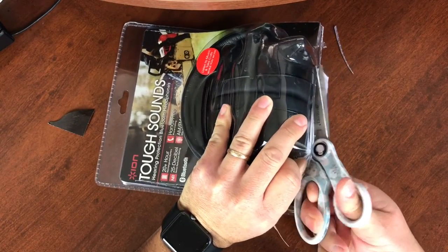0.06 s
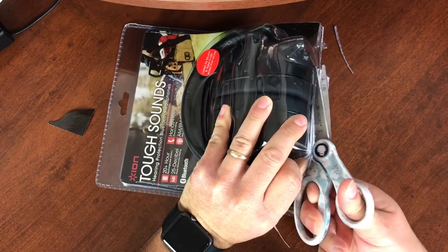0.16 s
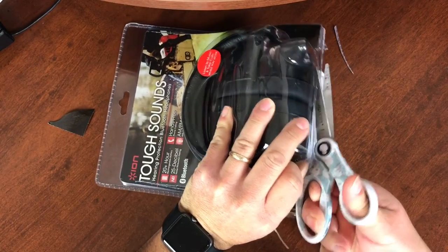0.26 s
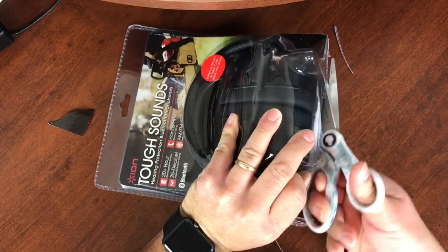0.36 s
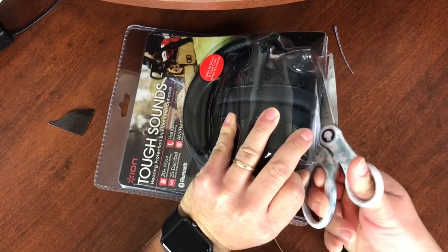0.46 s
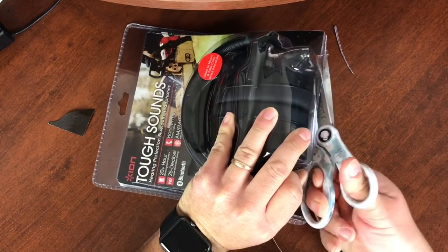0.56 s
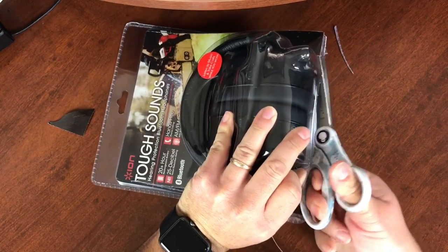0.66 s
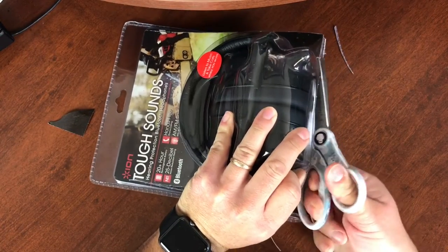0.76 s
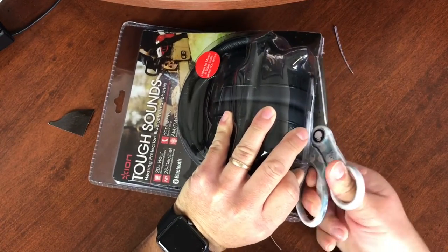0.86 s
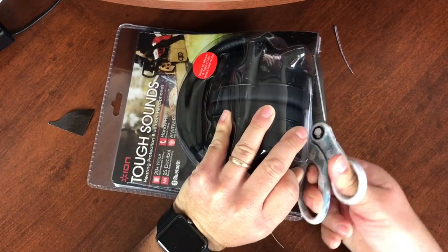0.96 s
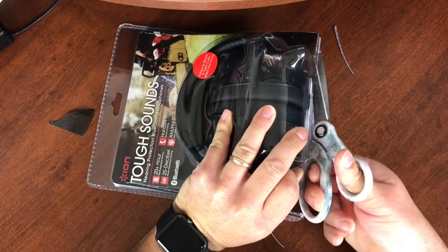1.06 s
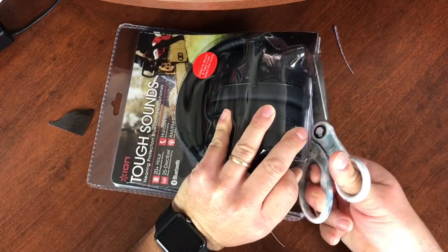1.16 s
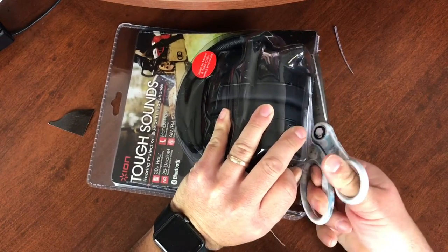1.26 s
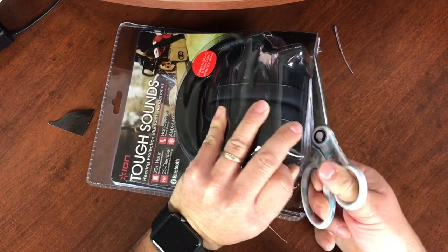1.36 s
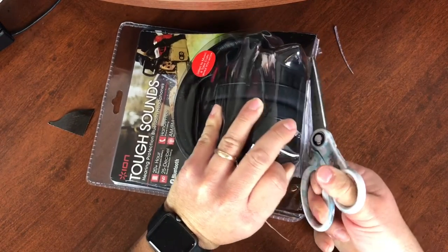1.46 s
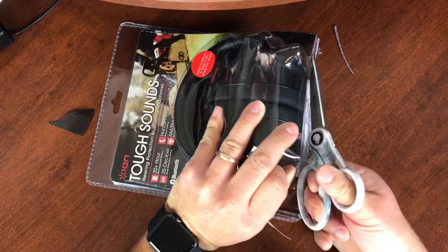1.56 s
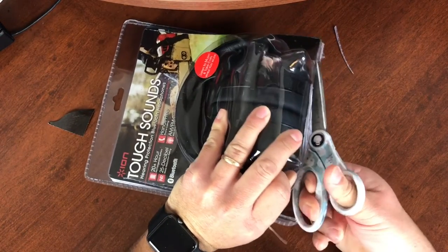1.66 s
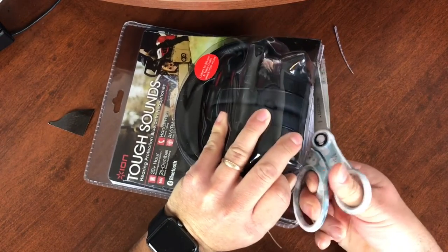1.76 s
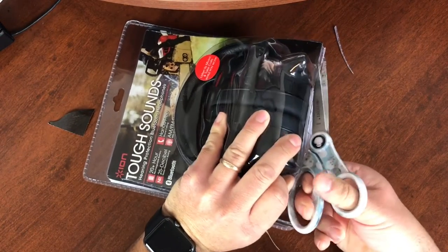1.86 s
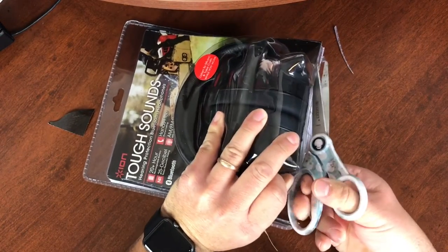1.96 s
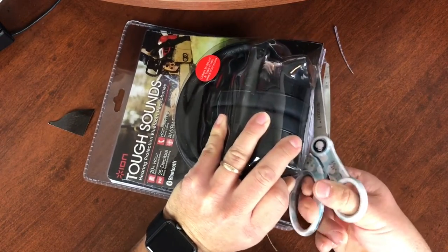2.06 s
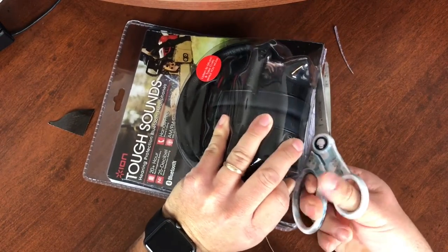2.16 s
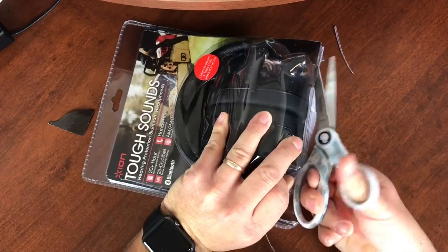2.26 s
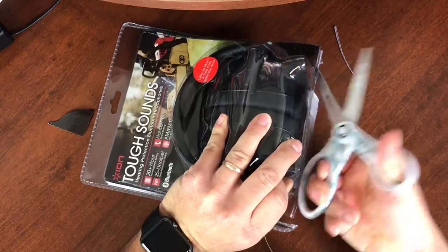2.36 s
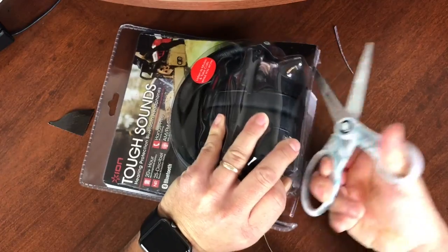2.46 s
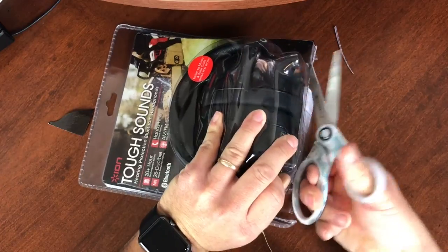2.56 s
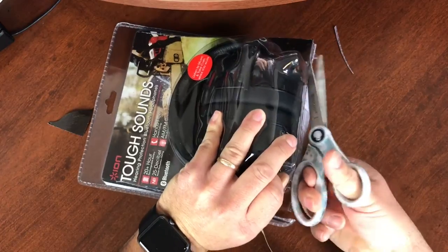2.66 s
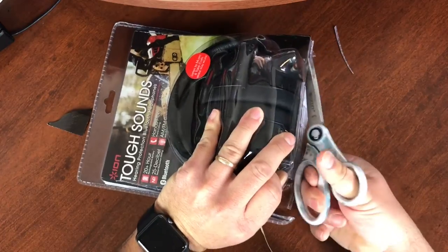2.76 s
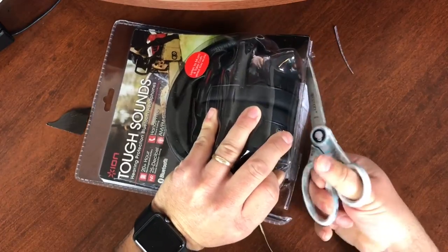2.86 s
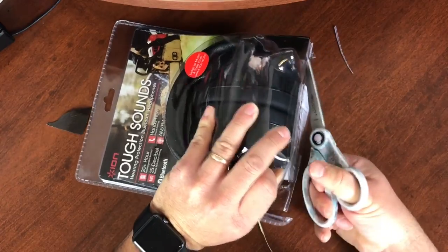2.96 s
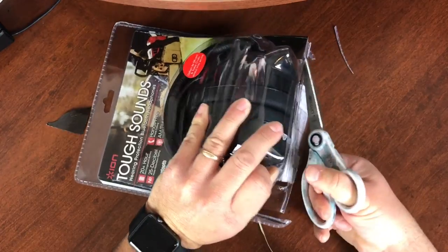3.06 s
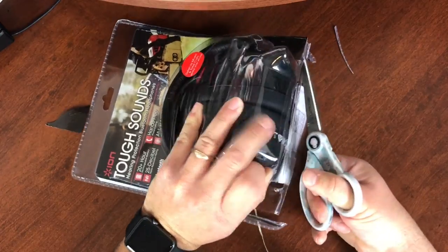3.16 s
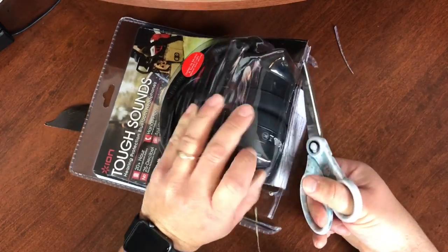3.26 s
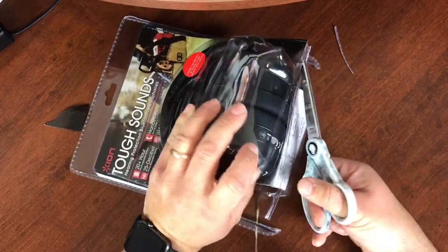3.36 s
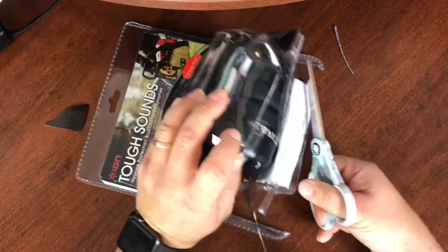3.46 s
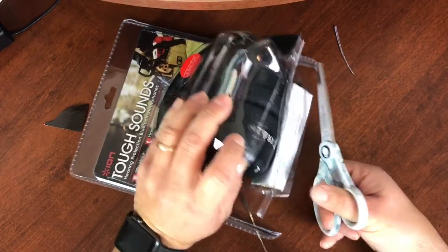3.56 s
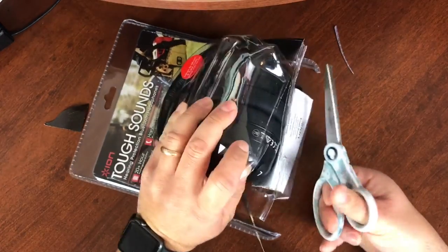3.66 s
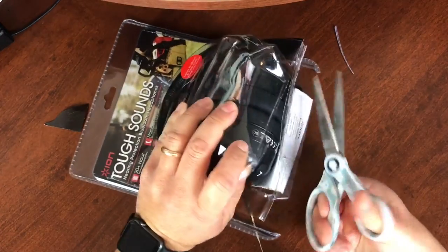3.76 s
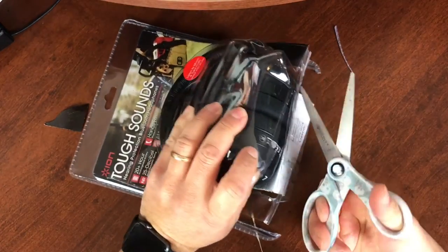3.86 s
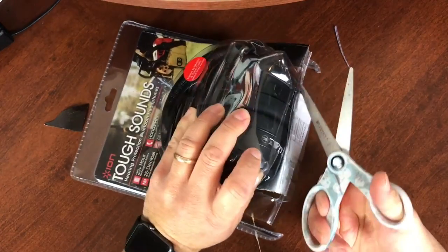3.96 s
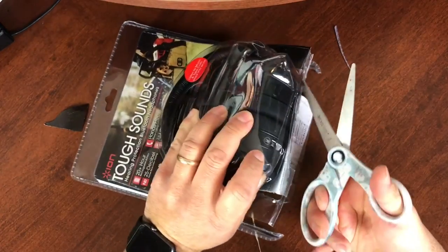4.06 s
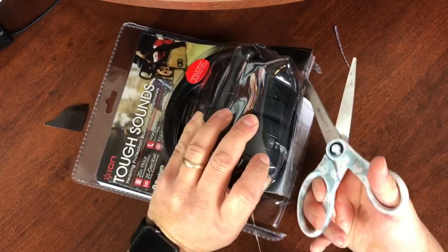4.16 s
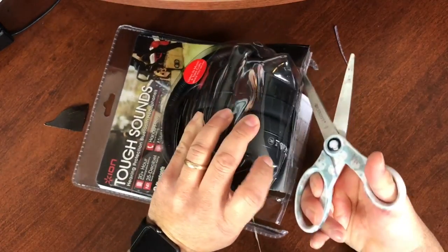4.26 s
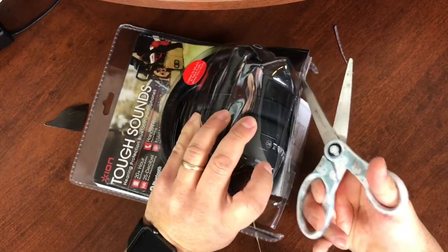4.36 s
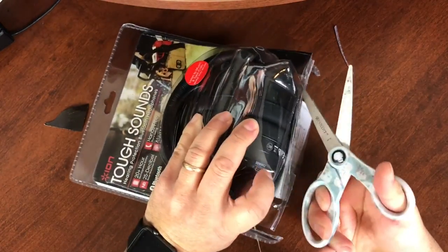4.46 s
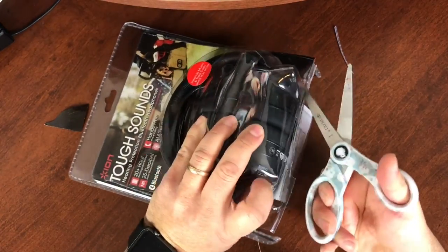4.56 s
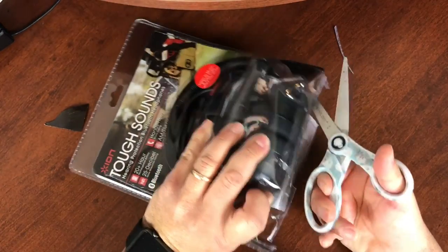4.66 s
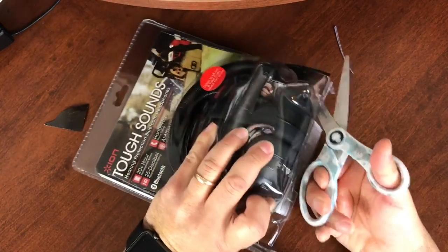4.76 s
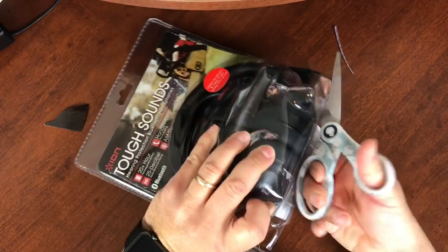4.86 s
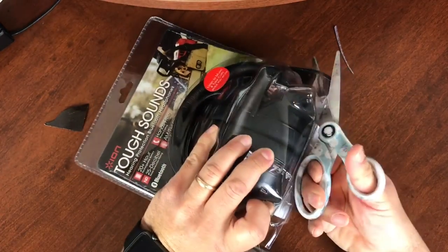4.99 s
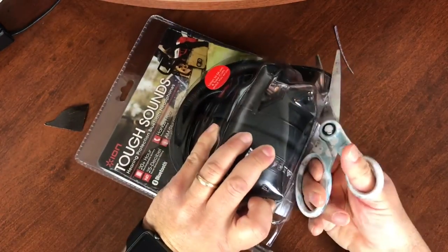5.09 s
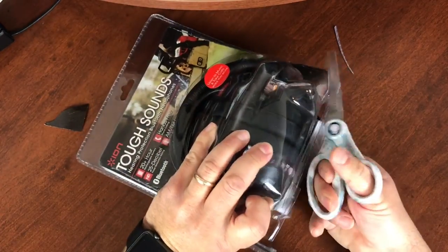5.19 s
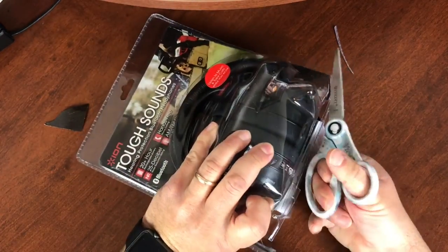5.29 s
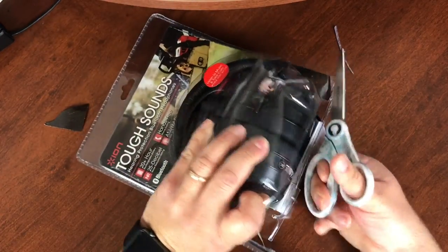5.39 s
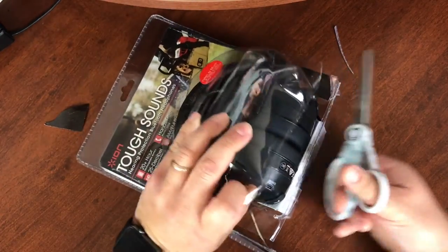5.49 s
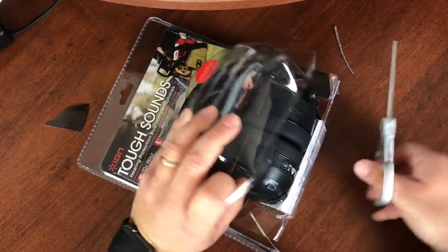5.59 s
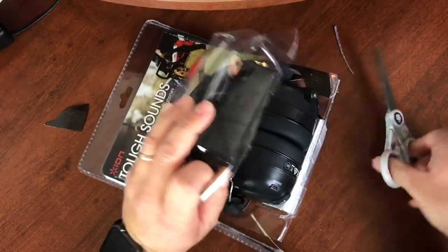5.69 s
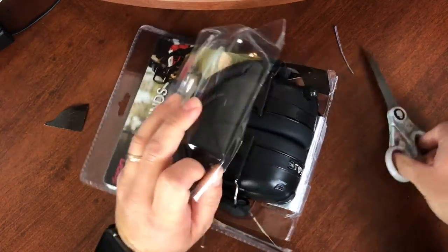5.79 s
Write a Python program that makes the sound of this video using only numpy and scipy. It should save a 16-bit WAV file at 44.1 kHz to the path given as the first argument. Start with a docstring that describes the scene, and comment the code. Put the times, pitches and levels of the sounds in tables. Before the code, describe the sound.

A small quiet room with low, rumbly room tone and a short echo, heard close to a wooden table. A stiff hollow plastic pack is rubbed and squeezed throughout, giving dull, grainy scraping with a thin rustle. A faint blade hiss passes at 0.1 s. Irregular boxy cracks follow, clearest at about 0.6, 0.85 and 1.3 s, with small ticks and pops between. From 1.8 to 2.7 s it is softer. A crack with a soft low table bump comes near 2.9 s, a hollow thud at 3.1, then a loud double snap at 3.4. It calms to light creaks and ticks around 3.6 to 4.5 s. Rubbing grows again, with a very sharp snap at 4.9 s, a bright fizzy one with a low bump at 5.2, and a hollow pop at 5.4. At 5.6 s the scissors are laid down with a brief metallic rattle; crisp plastic crackles at 5.8.

```python
"""Scissors work through a stiff plastic shell on a wooden table in a small quiet room.
From the start there is room tone, and hand and blades rub the pack: grains of noise that ring it or rustle.
Soon the sheet tears and buckles in short cracks, bursts of tiny slips that ring the hollow pack, and a blade
slides along it with a smooth hiss. Later come slow table thumps, made from fading sine waves.
Near the end the scissors are laid down with a short metallic rattle, made from noise through resonances."""
import sys
import numpy as np
from scipy import signal
from scipy.fft import rfft, irfft
from scipy.io import wavfile
from scipy.ndimage import uniform_filter1d

SR = 44100
rng = np.random.default_rng(int(sys.argv[2]) if len(sys.argv) > 2 else 0)


def master(y):
    """Save y as 16-bit WAV."""
    cut = np.clip(np.atleast_2d(y).T, -1, 1)
    pcm = np.round(cut * 32767)  # scale
    wavfile.write(sys.argv[1], SR, pcm.astype(np.int16))


N = 257103  # length of the scene in samples

# Room tone, colour of the steady background: (frequency [Hz], relative level per Hz [dB])
ROOM_TONE = [(8.8, -22), (15, 30), (37, 18.5), (169, 1.5), (770, -7), (1260, -18), (3720, -18.5),
             (10000, -27.5), (16000, -26)]
# How long the room echoes: (frequency [Hz], time to fall 60 dB [s])
ROOM_DECAY = [(150, 0.29), (500, 0.23), (1500, 0.43), (4000, 0.34), (8000, 0.3), (12000, 0.21),
              (16000, 0.2)]
# Near echoes from the table top and the arm: (delay [ms], level against the direct sound [dB])
NEAR_ECHOES = [(2.2, -6), (9.4, -13)]
# Pack dragged and squeezed: (time [s], scrape on the table [dB], rustle of the sheet [dB])
HANDLING = [(0, -65, -84), (.22, -69.5, -73.5), (.26, -54.5, -68), (.36, -56, -62.5), (.46, -66.5, -101),
            (.68, -53.5, -73), (.77, -60.5, -85), (1.07, -64.5, -92), (1.38, -52, -66), (1.52, -71.5, -93),
            (1.7, -59, -77), (1.85, -70, -84), (2.17, -72, -83), (2.3, -56.5, -71.5), (2.49, -69.5, -76.5),
            (2.54, -59, -81), (2.91, -56.5, -78), (3.0, -68, -72.5), (3.2, -61.5, -67.5),
            (3.451, -62.5, -62), (4.069, -80, -102), (4.2, -70.5, -79), (4.47, -80.5, -87),
            (4.53, -66, -85), (4.565, -66, -85.5), (4.609, -51.5, -54.5), (4.67, -56.5, -66.5),
            (4.75, -56.5, -72.5), (4.86, -57, -61.5), (4.97, -54, -69.5), (5.3, -68, -63.5),
            (5.551, -48, -66.5), (5.62, -66, -72.5), (5.701, -56, -86), (5.83, -81, -69)]
# Colour of the rustling sheet: (frequency [Hz], relative level per Hz [dB])
RUSTLE_COLOUR = [(700, -5), (1200, -32), (1600, 6.5), (2500, -10), (4000, 1.5), (7000, -6.5),
                 (14700, -22.5), (16000, -45.5)]
# Ringing tones of the hollow pack: (pitch [Hz], relative level [dB], time to fall 51 dB [s])
PACK_TONES = [(173, 3, 0.037), (216.4, 8.5, 0.021), (268.7, 8.5, 0.018), (377, 9.5, 0.027),
              (453.4, 3, 0.015), (540, 6, 0.022), (665.6, 13, 0.03), (778, 11.5, 0.025), (849, 8.5, 0.019),
              (1000, 3.5, .012)]
# Ringing tones of its curved wall: (pitch [Hz], relative level [dB], time to fall 51 dB [s])
WALL_TONES = [(775, 4, 0.0069), (1165, 6, 0.0077), (1280, 5.5, 0.074), (1530, 10, 0.025),
              (1780, -5, 0.0028)]
# Clear cracks, levels over 10 ms before the room:
# (time [s], crack [dB], thud of the body [dB], fizz [dB], thud pitch [Hz], crack pitch [Hz])
CRACK_EVENTS = [(0.124, -64.5, -64.5, -88, 298, 2110), (.262, -70, -46.5, -86, 570, 2000),
                (0.2832, -60.5, -45.5, -75, 716, 2200), (0.315, -49.5, -45.5, -53.5, 765, 2130),
                (.4723, -69, -62, -85, 410, 2100), (0.6078, -51, -39, -100, 415, 2640),
                (0.6431, -42, -31, -45, 302, 2400), (0.764, -66, -56, -62, 790, 2070),
                (0.8398, -37, -29, -42.5, 720, 3440), (1.018, -64.5, -63, -85, 360, 3630),
                (1.1685, -53.5, -41.5, -55, 583, 3300), (1.27, -58, -75, -65, 790, 2210),
                (1.3158, -44, -28.5, -88, 418, 3440), (1.4074, -50, -50, -50.5, 870, 4550),
                (1.4842, -67.5, -49, -87, 715, 1900), (1.6007, -59.5, -53, -87, 700, 2560),
                (1.6314, -46.5, -45, -56.5, 480, 2130), (1.6634, -63, -50.5, -90, 760, 2090),
                (1.7092, -55.5, -41.5, -89, 700, 2280), (1.745, -67, -54.5, -87, 590, 3830),
                (1.7985, -59, -69, -59.5, 368, 3970), (1.9805, -62.5, -60, -93, 260, 4400),
                (2.013, -64, -47, -87, 475, 1800), (2.1248, -63.5, -70, -63, 315, 3800),
                (2.191, -60.5, -61.5, -87, 291, 5340), (2.407, -65.5, -78, -66, 357, 4040),
                (2.5765, -60.5, -51.5, -59, 410, 3450), (2.6006, -58.5, -69, -87, 683, 1900),
                (2.6913, -62.5, -53.5, -86, 840, 3000), (2.7077, -68, -45.5, -82, 494, 1970),
                (2.7157, -61.5, -60, -89, 318, 5070), (2.7463, -62.5, -55.5, -85, 794, 3420),
                (2.8146, -51.5, -38, -55.5, 324, 2060), (2.939, -41, -47.5, -46.5, 690, 5230),
                (3.108, -53.5, -30, -58.5, 900, 2170), (3.3336, -64, -61, -87, 428, 3500),
                (3.3678, -30.5, -24.5, -36.5, 494, 1800), (3.4153, -30, -36, -32, 350, 4530),
                (3.5269, -50.5, -42.5, -75, 745, 1900), (3.5859, -48.5, -50.5, -48.5, 855, 3820),
                (3.8023, -50.5, -55, -52.5, 424, 3870), (3.8551, -59.5, -63, -62, 348, 3600),
                (3.9095, -62, -66, -84, 340, 3400), (3.9652, -63.5, -59.5, -70, 696, 2120),
                (4.118, -64.5, -59.5, -66, 740, 1950), (4.138, -57.5, -43, -96, 694, 1900),
                (4.259, -59.5, -59.5, -75, 680, 5500), (4.2802, -58.5, -63, -79, 630, 3670),
                (4.427, -66.5, -61, -87, 390, 4200), (4.5234, -55, -50.5, -73, 300, 3500),
                (4.576, -51.5, -54, -69, 390, 2130), (4.6797, -51, -43, -56, 333, 2340),
                (4.8191, -63, -53, -69, 362, 3560), (4.8421, -55.5, -40, -50.5, 414, 3300),
                (4.871, -67, -48, -75, 400, 4200), (4.8928, -21.5, -21.5, -60, 540, 3560),
                (5.0632, -73, -46, -92, 312, 4300), (5.1321, -56, -47.5, -60, 363, 2200),
                (5.186, -23.5, -30, -23, 422, 4370), (5.342, -54.5, -58, -57.5, 600, 2980),
                (5.3587, -67, -55.5, -75, 596, 3850), (5.384, -62, -56, -75, 600, 2520),
                (5.430, -73, -52, -78, 600, 4930), (5.437, -45, -29, -81, 707, 2330),
                (5.8144, -38.5, -47, -36, 590, 4820), (5.827, -42.5, -52, -45, 796, 3950)]
# A blade slides along the sheet: (start [s], length [s], level before the swell and fade [dB])
BLADE_SLIDES = [(0.127, 0.103, -74.5)]
# Bands of the blade's hiss: (centre [Hz], width [Hz], relative level [dB])
BLADE_BANDS = [(1630, 300, 2), (4100, 900, 6.5), (5100, 500, -3), (6200, 500, -4.5)]
# The table top is knocked: (time [s], level before the swell and fade [dB])
TABLE_THUMPS = [(2.923, -36.5), (5.188, -37.5), (5.438, -48.5)]
# Ringing tones of the scissors: (pitch [Hz], relative level [dB], time to fall 33 dB [s])
SCISSOR_TONES = [(930, -9, 0.059), (1510, 8.5, 0.026), (1694, 9, 0.017), (1900, 8, 0.017),
                 (4030, 6, 0.0023), (7100, -12, 0.012)]

ROOM_TONE_DB = -56.5
LUMP_DB, GRIP_DB = 5.2, 4  # unevenness of the rubbing over about 10 ms and 70 ms
TEAR_MS, TEAR_SPREAD = 2.6, 0.25  # typical length of a hard tear, chance spread as a share
TEAR_SHORTENS = 0.2  # dB of length lost per dB of strength
SNAP_MS = 1  # the wall snaps over in this time
# The wall needs both: the weaker of thud and crack sets its level
CRUNCH_UNDER_THUD_DB, CRUNCH_OVER_CRACK_DB = 6, 1.5
# The whole pack jolts once: level against the thud, pitch and width as shares of the thud pitch
PUSH_DB, PUSH_PITCH, PUSH_WIDTH = -1.5, 0.49, 0.97
PUSH_DB_PER_OCTAVE, PUSH_REF_HZ = 8, 280  # higher-pitched thuds jolt it less
# Faint chance cracks ride on the rubbing; chance raises each one above the base level
TICKS_PER_S, TICK_BASE_DB, TICK_SPREAD_DB = 11, -1, 3.5
TICK_LOW_HZ, TICK_HIGH_HZ = 2000, 5500
TICK_THUD_DB, TICK_FIZZ_DB = 0, -4  # thud against the scrape, fizz against the crack
TICK_THUD_SHARE = 0.12  # thud pitch as a share of crack pitch
LAID_S, LAID_DB = 5.636, -42  # scissors laid down: time, level of their ringing over 10 ms
EDGE_HZ = 16300  # top edge of the sound


def gain_of(db):
    """Turns decibels into a multiplier."""
    return 10 ** (np.asarray(db) / 20)


def evened(x):
    """Scales a sound to an average (rms) level of 1."""
    return x / np.sqrt(np.mean(x ** 2) + 1e-20)


def level(x, db):
    """Gives a short sound the energy of 10 ms at db."""
    energy = (x ** 2).sum(-1, keepdims=True)
    return gain_of(db) * x / np.sqrt(energy * 100 / SR)


def read(points, hz):
    """Reads between the points of a table, with frequency on a log scale."""
    f, value = np.transpose(points)
    return np.interp(np.log(hz + 1), np.log(f + 1), value)


def add(mix, s, sound):
    """Mixes a sound in at time s, cutting off what runs past the end."""
    part = mix[..., round(s * SR):][..., :sound.shape[-1]]
    part += sound[..., :part.shape[-1]]


def ring(x, hz, width_hz):
    """A resonance: narrow ones ring long; a steady push gives no sound."""
    r = np.exp(-np.pi * width_hz / SR)
    return signal.lfilter([1 - r, 0, r - 1], [1, -2 * r * np.cos(2 * np.pi * hz / SR), r * r], x)


def shaped(x, spectrum):
    """Colours a long sound by a table of frequency and level."""
    hz = np.fft.rfftfreq(len(x), 1 / SR)
    return evened(irfft(rfft(x) * gain_of(read(spectrum, hz)), len(x)))


def room_tone():
    """The quiet room is steady coloured noise."""
    return gain_of(ROOM_TONE_DB) * shaped(rng.standard_normal(N), ROOM_TONE)


def room(direct, *parts, tail_db=-7.):
    """Near echoes repeat the direct sound; each vibrating part has its own fading tail of random echoes."""
    out = direct.copy()
    for ms, db in NEAR_ECHOES:
        add(out, ms / 1000, gain_of(db) * direct)
    slots = np.arange(200, SR // 2 - 20, 20)
    for part in parts:
        taps = np.zeros(SR // 2)
        taps[slots + rng.integers(0, 20, len(slots))] = rng.choice([-1., 1.], len(slots))
        # each frequency fades at its own rate
        hz, t, spectrum = signal.stft(taps, SR, nperseg=256)
        fade = gain_of(-60 * t / read(ROOM_DECAY, hz)[:, None])
        tail = signal.istft(spectrum * fade, SR, nperseg=256)[1]
        out += signal.fftconvolve(part, tail)[:N] * gain_of(tail_db) / np.linalg.norm(tail)
    return out


def pack(x, modes, centre_hz=560, focus_db=0., place_db=0., bend=0.):
    """Rings a body's tones: those far from the struck pitch speak less, place and grip vary level and pitch."""
    place, grip = rng.standard_normal((2, len(modes)))
    total = 0
    for k, (hz, db, fall_s) in enumerate(modes):
        octaves = np.log2(hz / centre_hz)
        gain = gain_of(db + place_db * place[k] - focus_db * octaves ** 2)
        # neighbouring tones swing in opposition
        total = total + (-1) ** k * gain * ring(x, hz * (1 + bend * grip[k]), 1.88 / fall_s)
    return total


def handling(s):
    """Hand effort: scrape and rustle levels in dB at times s."""
    at, *columns = np.transpose(HANDLING)
    return np.array([np.interp(s, at, db) for db in columns])


def rubbing():
    """Dense grains of sticking and slipping: the dull part rings the pack, the bright part is the sheet."""
    effort = gain_of(handling(np.arange(N) / SR))
    lumps = evened(uniform_filter1d(rng.standard_normal((2, N)), 400))
    grain_db = 2.4 * np.minimum(rng.exponential(1, (2, N)), 6)
    grit = rng.standard_normal((2, N)) * gain_of(grain_db + LUMP_DB * lumps)
    # the fingers wander over three places
    grip = gain_of(GRIP_DB * evened(uniform_filter1d(rng.standard_normal((3, N)), 3000)))
    body = sum(pack(g * grit[0], PACK_TONES, focus_db=-2.0, place_db=3.5, bend=0.066) for g in grip)
    scrape = evened(body + 0.17 * pack(grit[0], WALL_TONES))
    # the damped face of the table answers broadly
    table_face = evened(ring(ring(grit[0], 620, 330), 510, 470))
    scrape = evened(scrape + 0.46 * table_face)
    return effort[0] * scrape + effort[1] * shaped(grit[1], RUSTLE_COLOUR)


def crack(crack_db, thud_db, fizz_db, thud_hz, crack_hz):
    """A tear is a cluster of tiny uneven slips that shake the stiff sheet and push the pack.
    Row 0 is heard directly; the others hold the even colour of each part, for the room."""
    t = np.arange(4096) / SR
    # faint tears drag on longer
    shortening_db = TEAR_SHORTENS * (max(crack_db, thud_db) + 22.5)
    tear_s = TEAR_MS / 1000 * np.exp(TEAR_SPREAD * rng.standard_normal()) * gain_of(-shortening_db)
    slips = rng.standard_normal(len(t)) * gain_of(1.06 * rng.exponential(1, len(t)))
    slips *= np.minimum(t / (0.27 * tear_s), 1) * np.exp(-(t / tear_s) ** 2)
    # the second row is a single click, which brings out the even colour
    slips = np.array([slips / np.linalg.norm(slips), t == 0])

    ping = ring(slips, crack_hz, .15 * crack_hz)
    broad = ring(slips, crack_hz, 2.26 * crack_hz)
    sheet = ring(1.1 * ping + broad, 0.25 * crack_hz, 1.84 * crack_hz)
    # the thick sheet carries little above its pitch
    sheet = signal.lfilter(*signal.butter(2, min(2.27 * crack_hz, .4 * SR), fs=SR), sheet)
    fizz = ring(ring(slips, 4100, 7900), 6000, 16000)

    shove = np.sin(np.pi * np.minimum(t / SNAP_MS * 1000, 1)) ** 2  # the wall snaps over in one push
    body = pack(shove + 0.55 * slips, PACK_TONES, thud_hz, focus_db=4.0, place_db=2.5, bend=0.044)
    push_hz = PUSH_PITCH * thud_hz
    push = ring(ring(shove, push_hz, PUSH_WIDTH * thud_hz), push_hz, thud_hz)
    push_db = thud_db + PUSH_DB - PUSH_DB_PER_OCTAVE * np.log2(thud_hz / PUSH_REF_HZ)
    thud = level(body, thud_db) + level(push, push_db)

    crunch_db = min(thud_db - CRUNCH_UNDER_THUD_DB, crack_db + CRUNCH_OVER_CRACK_DB)
    crunch = level(pack(slips, WALL_TONES, place_db=7.5, bend=0.02), crunch_db)
    parts = np.array([level(sheet, crack_db), level(fizz, fizz_db), thud, crunch])
    return np.vstack([parts[:, 0].sum(0), parts[:, 1]])


def ticks():
    """Faint cracks at chance moments follow the strength of the handling there."""
    when, size, pitch = rng.random((int(TICKS_PER_S * N / SR), 3)).T
    s = when * N / SR
    scrape_db, rustle_db = handling(s) + TICK_BASE_DB - TICK_SPREAD_DB * np.log(size)
    hz = TICK_LOW_HZ * (TICK_HIGH_HZ / TICK_LOW_HZ) ** pitch
    # same columns as the clear cracks
    return zip(s, rustle_db, scrape_db + TICK_THUD_DB, rustle_db + TICK_FIZZ_DB, TICK_THUD_SHARE * hz, hz)


def slide(length_s, db):
    """Steel on plastic hisses smoothly: noise in a few bands, swelling and fading."""
    t = np.arange(0, length_s, 1 / SR)
    noise = rng.standard_normal(len(t))
    hiss = sum(gain_of(a) * evened(ring(noise, hz, width_hz)) for hz, width_hz, a in BLADE_BANDS)
    return gain_of(db) * evened(hiss) * np.sin(np.pi * t / length_s) ** .4


def thump(db):
    """The knocked table top gives a few slow swings that die away."""
    t = np.arange(8192) / SR
    swing = np.sin(2 * np.pi * 55 * t)
    return gain_of(db) * swing * np.minimum(t / 0.0073, 1) * np.exp(-t / 0.041)


def scissors(db):
    """Handles and blades rattle down on the table: bursts of noise make the metal ring briefly."""
    t = np.arange(8192) / SR
    rattle = rng.standard_normal(len(t)) * np.exp(-t / 0.0067)
    touch = rng.standard_normal(len(t)) * np.exp(-t / 0.0016)  # first touch of the tips
    knock = pack(rattle, PACK_TONES)  # the blow shakes the pack lying beside
    metal = sum(gain_of(a) * evened(ring(rattle, hz, 1.2 / fall_s)) for hz, a, fall_s in SCISSOR_TONES)
    return level(ring(touch, 4300, 5700), db - 17.5) + level(knock, db - 7) + level(metal, db)


def scene():
    """Rubbing, cracks, slides and scissors sound in the room, over table thumps and room tone."""
    near = np.zeros((5, N))  # direct sound, then the four parts that feed the room
    table = np.zeros(N)
    add(near[:2], 0, rubbing())
    for s, *blow in [*CRACK_EVENTS, *ticks()]:
        add(near, s, crack(*blow))
    for s, *stroke in BLADE_SLIDES:
        add(near[:2], s, slide(*stroke))
    for s, db in TABLE_THUMPS:
        add(table, s, thump(db))
    add(near[:2], LAID_S, scissors(LAID_DB))
    return (room(*near) + table + room_tone())[None]


def record(dry):
    """The input stage rounds off the highest peaks; then a filter removes the very top of the treble."""
    rounded = .7 * np.tanh(dry / .7)
    low_pass = signal.firwin(511, EDGE_HZ, window=("kaiser", 9), fs=SR)
    return signal.oaconvolve(rounded, low_pass[None], "same")


dry = scene()
out = record(dry)
master(out)
```